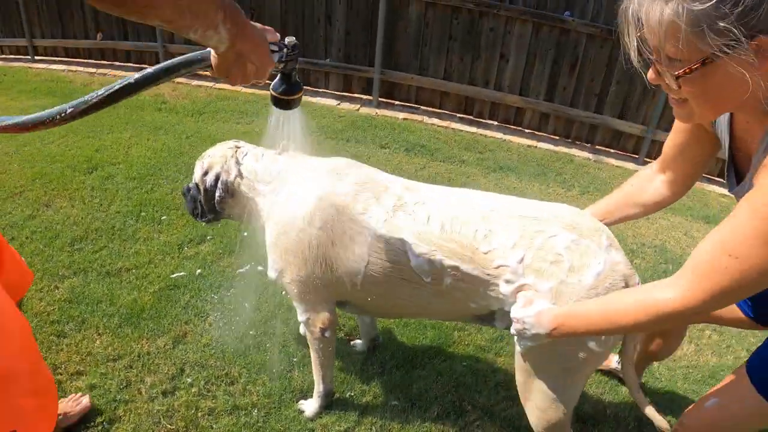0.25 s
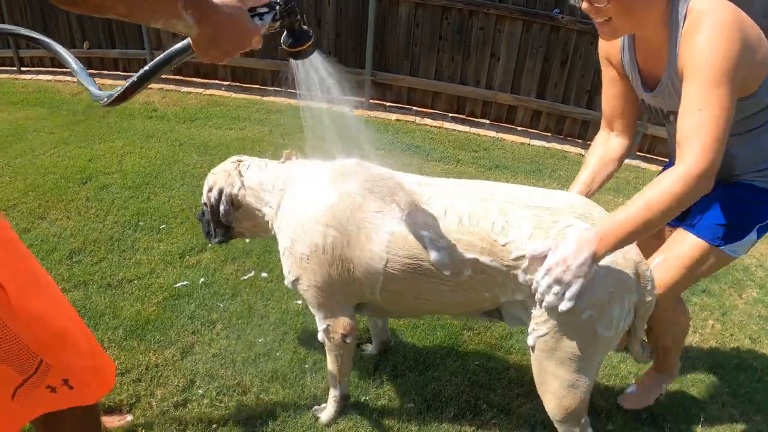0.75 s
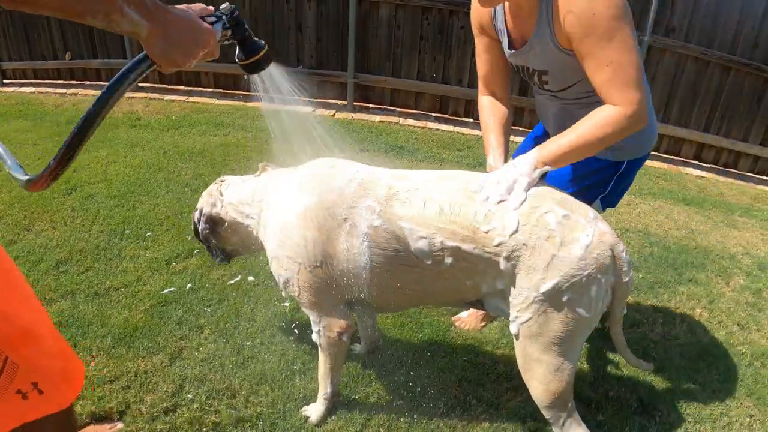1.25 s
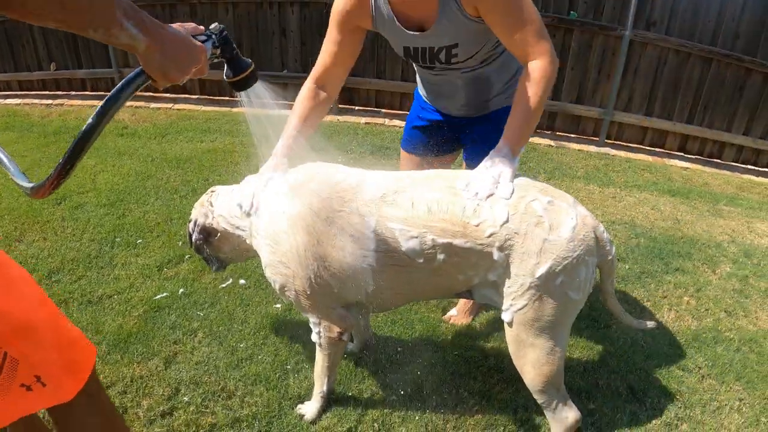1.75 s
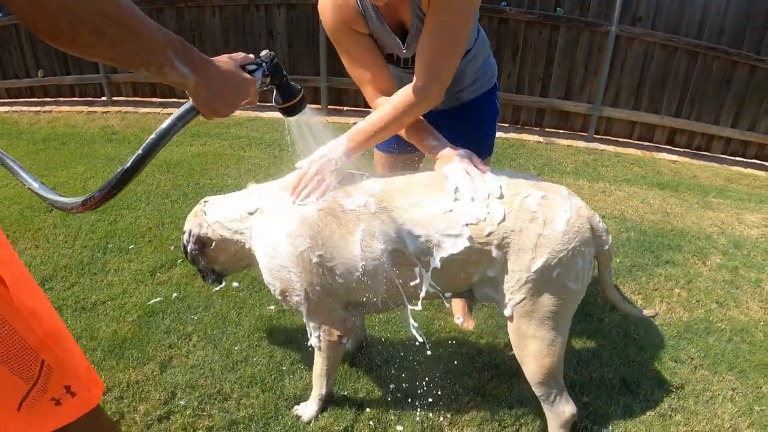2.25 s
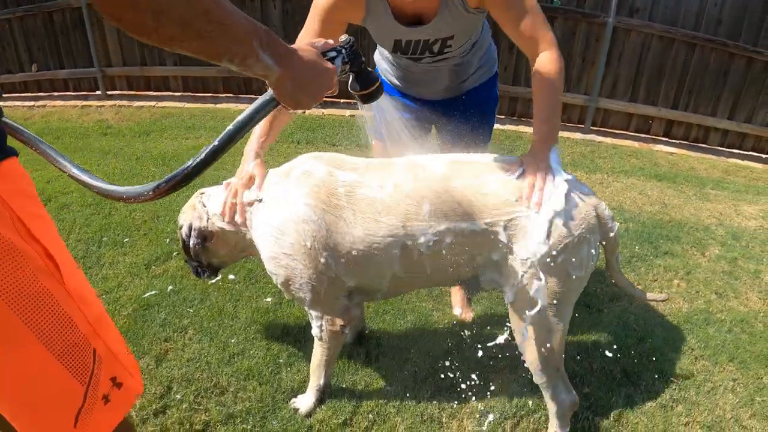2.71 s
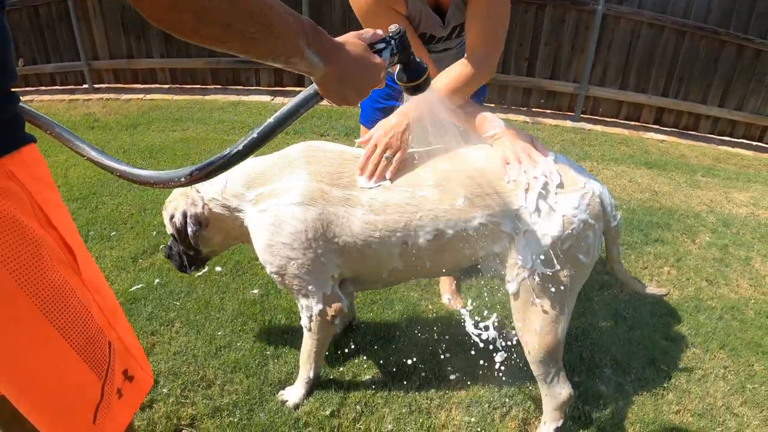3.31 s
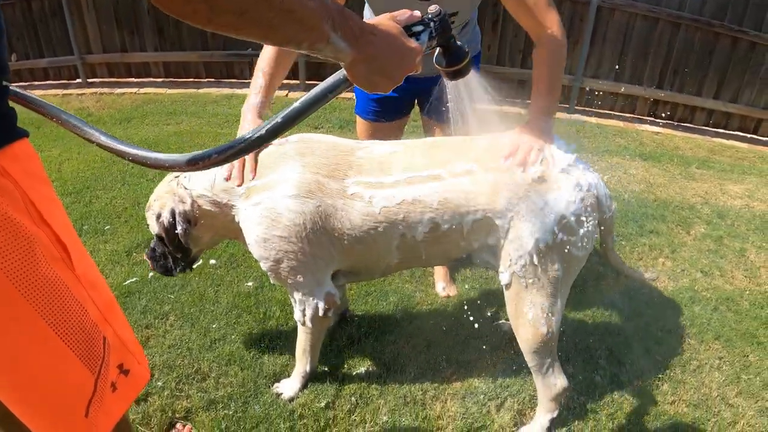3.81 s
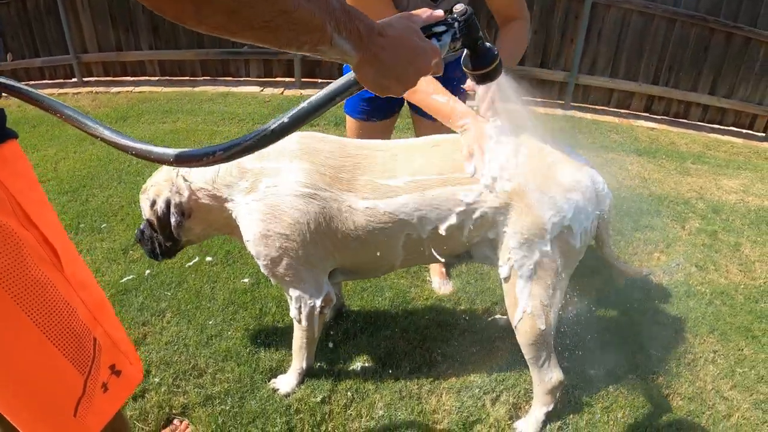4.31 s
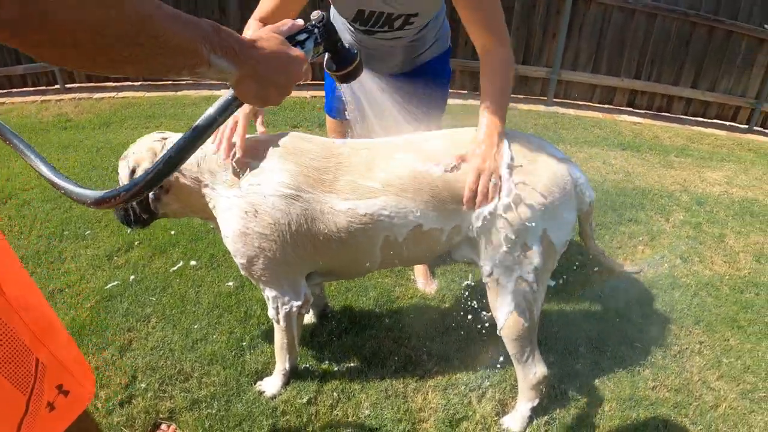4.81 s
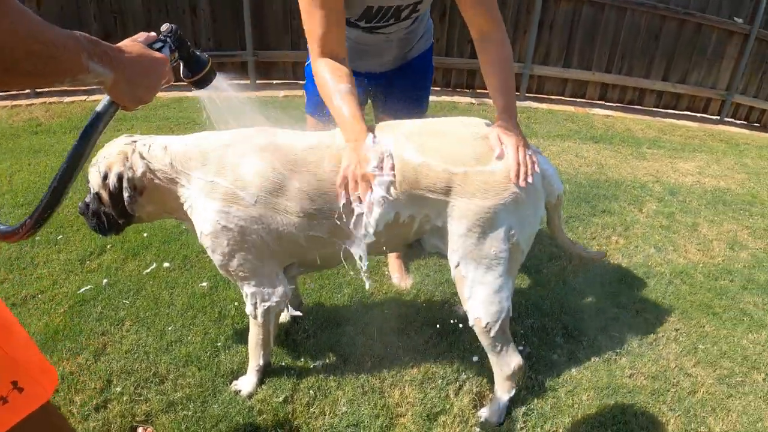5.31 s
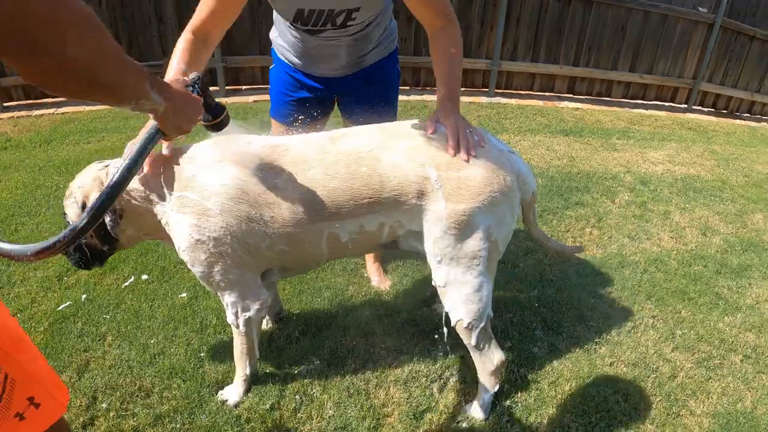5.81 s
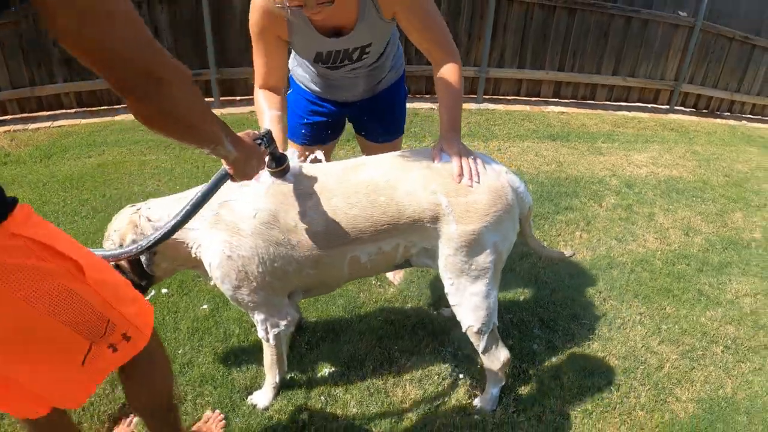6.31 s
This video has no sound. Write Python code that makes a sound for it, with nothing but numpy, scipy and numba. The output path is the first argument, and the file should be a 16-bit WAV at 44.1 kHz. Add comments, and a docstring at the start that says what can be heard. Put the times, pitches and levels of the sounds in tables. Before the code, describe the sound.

A hose jet patters continuously on a dog's wet, foamy coat, close to a small outdoor camera, with little echo. From 0 to 1.3 s the spray is fairly low and drumming, broken by quick soft dips about every 0.2 s, while wind buffets thud and a distant engine throbs low, its pitch falling early, rising slightly around 1.3 s, and fading out by about 1.7 s. From 2 s the spray becomes brighter, fizzing and hissing, repeatedly jumping up in pitch and gliding down, leaning right between 3 and 5 s. Faint fan hum, distant traffic and low rumble lie well beneath. After 5 s it recentres and mellows; from about 5.85 s it weakens, its fine hiss dropping away after 6.2 s, with short dips near 6.4 and 6.5 s. A low gust and dull knocks come at 6.4 to 6.5 s, as thin spray continues.

```python
"""A garden hose sprays a soapy dog on a lawn, a metre or two from a small camera with two microphone ports.
Thousands of drops a second ring briefly on the wet coat: heavy ones drum, middling ones fizz, mist hisses.
The jet sweeps over the back, its pitches gliding and its level dipping; each drop has its own lag at the ports.
Behind it a far engine throbs in sine partials and fades, over a fan's hum and two gliding tones.
Shaped noise makes rumble, distant traffic and light wind; short low pulses make buffets and thumps."""
import sys
import numpy as np
from scipy import signal
from scipy.fft import rfft, irfft, next_fast_len
from scipy.io import wavfile
from scipy.ndimage import uniform_filter1d, map_coordinates
from numba import njit

SR = 44100
rng = np.random.default_rng(int(sys.argv[2]) if len(sys.argv) > 2 else 0)


def unload_audio(sound):
    """Save the sound as a 16-bit wav file, at the path given as the first command line argument."""
    columns = np.transpose(np.atleast_2d(sound))
    # keep every value between -1 and 1, then stretch to whole-number steps
    steps = np.round(np.clip(columns, -1, 1) * 32767)
    wavfile.write(sys.argv[1], SR, steps.astype(np.int16))


N = 288855

# Spray levels stand ahead of the wandering resonances and the microphone's response.
# Where the jet lands: t/s, left minus right/dB and left lag behind right/samples (both scaled by drop size),
# middling pitch spread/octaves, mist pitch shift/octaves
JET_AIM = [(0.0, 0.5, 0.93, 0.47, -0.1), (1.4, -1, 1.1, 0.4, 0.0054), (2.24, -1.5, 1.3, 0.44, 0.047),
           (3.0, -4, 1.93, 0.39, 0.13), (3.74, -4, 2.34, 0.34, -0.03), (4.67, -5.5, 2.24, 0.39, -0.052),
           (5.2, -1, 1.38, 0.304, -0.03), (5.5, -1, 0.82, 0.48, 0.034), (6.18, -0.5, 0.63, 0.51, 0.049),
           (6.55, -0.5, 0.45, 0.38, 0.075)]
# Stretches of the jet's sweeps over the coat, some continuing the sweep before: start t/s,
# middling f/Hz at start, at end, middling level/dB at start, at end,
# heavy f/Hz, heavy level/dB at start, at end, mist level/dB at start, at end
JET_STRETCHES = [(0.0, 2350, 2450, -28, -27.5, 1400, -26, -29, -33, -31),
                 (0.49, 2610, 2410, -29, -30.5, 1238, -28.5, -29, -33, -32.5),
                 (0.85, 2580, 2610, -28.5, -29, 1385, -33, -32, -34, -31),
                 (1.04, 2900, 2900, -29, -29, 1620, -34, -29.5, -32, -34),
                 (1.27, 3000, 2850, -27.5, -29, 1600, -28, -34, -35, -31.5),
                 (1.6, 2980, 2722, -29, -26, 1590, -33, -34.5, -33, -32),
                 (2.06, 4300, 4100, -29.5, -27, 1690, -35.5, -46.5, -31, -34),
                 (2.32, 3580, 2930, -26, -26.5, 1593, -37.5, -32, -33, -29.5),
                 (2.59, 4220, 3230, -27.5, -25.5, 1690, -32.5, -41.5, -31, -31.5),
                 (2.95, 3210, 2610, -26.5, -30, 1545, -36.5, -31.5, -31.5, -33.5),
                 (3.268, 4030, 4270, -33.5, -31.5, 1598, -44, -48, -32, -32.5),
                 (3.35, 4520, 2720, -28, -25, 1610, -42.5, -35, -31, -33),
                 (3.81, 4500, 4020, -28, -26, 1550, -37, -40.5, -31.5, -34.5),
                 (4.1, 3980, 2835, -27, -27.5, 1620, -32, -34.5, -34.5, -36),
                 (4.48, 4140, 4160, -26.5, -26.5, 1610, -32.5, -38.5, -36, -33.5),
                 (4.79, 4296, 3260, -29, -27, 1666, -39.5, -39, -31, -31),
                 (5.03, 2975, 2400, -25, -27, 1654, -38, -34, -33, -32),
                 (5.26, 3970, 3370, -27, -27.5, 1575, -35, -39, -32.5, -32.5),
                 (5.6, 3330, 2920, -28.5, -28.5, 1567, -45, -36, -32, -31.5),
                 (5.85, 3000, 3030, -29.5, -33, 1550, -35, -40, -30.5, -31.5),
                 (6.08, 3090, 3150, -34.5, -32, 1596, -39, -40, -32, -35.5),
                 (6.24, 2950, 2700, -35, -37.5, 1544, -37, -35.5, -40, -42.5),
                 (6.43, 2600, 2580, -33, -32, 1500, -29.5, -33, -41.5, -40)]
# Jet briefly broken or swinging off the coat: t/s, half width/s,
# dip/dB of middling drops, heavy drops, mist (negative lifts)
JET_BREAKS = [(0.116, 0.088, 7.5, 12, 9), (.31, 0.059, 5, 5.5, 3.5), (.49, 0.054, 5, 4.5, 6.5),
              (.68, 0.037, 3.5, 6, 2), (.84, 0.058, 6, 6.5, 7), (1.025, 0.046, 3.5, 2, 4),
              (1.26, 0.058, 2.5, 10, -2), (1.6, 0.061, 1.5, -1.5, 5), (2.06, 0.061, 6.5, -0.5, 5),
              (2.32, 0.027, 5.5, 2, 0.5), (2.595, 0.065, 5, 2.5, 7), (3.248, 0.032, 6, 3, 1.5),
              (3.336, 0.024, 8, -2, 5.5), (3.72, 0.075, 3, 0, 1.5), (3.83, 0.07, 5, 0.5, 0.5),
              (4.489, 0.067, 3, -1.5, 0), (4.8, 0.054, 2.5, -0.5, 5.5), (5.265, 0.037, 7.5, -1, 4),
              (5.82, 0.033, 0, 6, 1.5), (6.385, 0.047, 8, 7.5, 7), (6.53, 0.047, 6, 5.5, 6)]
# Faint late copy of the spray off the wet back, throughout, its delay shifting near the end:
# t/s, delay/ms, strength/share of direct
COAT_MIRROR = [(5.3, 0.36, 0.04), (5.7, 0.37, 0.04), (5.92, 0.42, 0.04), (6.08, 0.41, 0.06),
               (6.25, 0.447, 0.01), (6.55, 0.37, 0.02)]
# Narrow resonances wandering as the jet and hands move over the coat:
# t/s, then f/Hz and boost/dB of the low, middle and high one
COAT_RINGS = [(0.0, 1100, 0, 1360, 4, 2300, 2.2), (.19, 1050, 6, 1420, 6, 1900, 2),
              (.275, 1050, 8, 1450, 1, 1910, 7.9), (.41, 1190, 6, 1500, 1, 1800, 3.5),
              (.55, 1050, 7, 1420, 1, 1800, 1), (.63, 1050, -2, 1420, 5.8, 1820, 6),
              (.79, 1080, 5.5, 1360, 2, 1800, 3.8), (.91, 1050, 2, 1370, 5.3, 1900, 1),
              (1.1, 1000, 3, 1470, 2.7, 2100, 3), (1.4, 960, 5.5, 1380, 6, 2000, 1.04),
              (1.75, 979, 3.5, 1470, 5, 2200, 2.4), (2.0, 980, 8, 1430, 4.5, 2200, 2.2),
              (2.2, 950, 2, 1500, 1, 2180, 3), (2.48, 960, 4.5, 1380, 5.5, 2097, 3),
              (2.64, 955, 8, 1660, 4.4, 2200, 2), (2.85, 950, 5.5, 1550, 1, 2190, 2.7),
              (3.14, 960, 6.5, 1600, 6.6, 2200, 1.7), (3.5, 920, 5, 1470, 3.3, 2200, 3),
              (3.8, 1050, 4.5, 1450, 4.9, 2100, 2), (4.15, 1110, 2, 1470, 6.1, 1997, 1),
              (4.57, 1100, 2.5, 1420, 3.84, 1840, 4.7), (4.9, 950, 2, 1500, 3.54, 2100, 3),
              (5.2, 1060, 5, 1500, 4, 2200, 3), (5.47, 1080, 7, 1550, 2, 2200, 2),
              (5.75, 1020, 7, 1390, 5.5, 2290, 3), (5.95, 1030, 6.5, 1500, 1, 2480, 5.1),
              (6.15, 1000, 0, 1620, 5, 2505, 4.9), (6.35, 1000, 3, 1550, 5.6, 2680, 5),
              (6.55, 1000, 2, 1500, 3.3, 3100, 3)]
# Microphone behind its waterproof membrane: f/Hz, level/dB
MEMBRANE_RESPONSE = [(300, -12), (600, -11), (760, -11), (880, -10), (1000, -7), (1250, -8), (1500, -7.5),
                     (1900, -5.5), (2500, -2.5), (3800, 0), (4700, 1.5), (5150, 1), (5450, -0.5),
                     (6500, 2.5), (7700, 1.5), (8800, 3), (11000, -2.5), (12200, -2), (15000, -7)]
# Extra shading of the far port, on the left: f/Hz, level/dB
FAR_PORT_SHADING = [(200, -1.24), (1500, -0.26), (3000, 1.5), (5000, -1), (8000, -4), (11000, -2.5),
                    (14000, -2)]
# Neighbourhood rumble: t/s, level/dB before its waver
RUMBLE_LEVEL = [(0.0, -38), (.6, -36.5), (1.2, -39.5), (1.8, -39), (2.8, -42.5), (4.1, -42), (5.0, -43.5),
                (5.8, -44), (6.45, -42), (6.55, -40)]
# Rumble colour: f/Hz, relative level/dB per Hz
RUMBLE_COLOUR = [(24, -39), (40, -12), (65, 0), (86, -1.5), (123, -3.5), (145, -9), (172, -8.5), (271, -21),
                 (400, -34.5), (700, -70)]
# Distant traffic: t/s, level/dB before its swells
TRAFFIC_LEVEL = [(0.0, -50.5), (0.7, -50.5), (1.28, -56), (1.45, -54), (1.97, -54), (2.2, -56.5),
                 (3.2, -53), (4.2, -54), (5.0, -58), (5.8, -57), (6.05, -59.5), (6.55, -47)]
# Traffic colour: f/Hz, relative level/dB per Hz
TRAFFIC_COLOUR = [(120, -25), (200, 5.5), (300, 2), (521, -0.5), (800, 0.5), (900, 2.5), (1170, -4.5),
                  (1980, -90)]
# Gusts on the ports: crest t/s, level/dB, left minus right/dB, half width/s
WIND_GUSTS = [(.095, -32, -16, 0.032), (.35, -36, -5, 0.26), (.72, -43, -11, 0.067),
              (.94, -36.5, 10, 0.053), (1.33, -41, 9, 0.14), (1.71, -38.5, 12, 0.15), (2.15, -50, -2, 0.13),
              (2.7, -52, 0, .1), (3.5, -51, 0, .1), (3.9, -55, 0, .15), (4.55, -54, -5, .15),
              (5.15, -45, -4, 0.18), (5.5, -48, -5, 0.072), (5.92, -50, 0, .1), (6.22, -47, 10, 0.045),
              (6.43, -29, 2, 0.044)]
# Wind colour: f/Hz, relative level/dB per Hz
WIND_COLOUR = [(8, -24), (18, -14), (38, 5), (55, -9), (90, -56)]
# Far engine shifting up a gear: t/s, firing rate f/Hz before its waver, first partial level/dB,
# second partial level/dB before its flutter, throb depth/0-1
ENGINE_PATH = [(0.0, 124.8, -39, -51.5, 0.3), (0.2, 110.8, -40, -50.5, 0.4), (0.33, 100, -29.5, -46.5, .05),
               (.43, 99.4, -31.5, -42.5, 0), (0.55, 99.1, -27, -45, 0.05), (.66, 98.7, -36.5, -46, .05),
               (0.75, 99.7, -29, -43, 0), (0.84, 99, -40, -44.5, 0.4), (0.95, 99.2, -33.5, -47.5, 0.1),
               (1.3, 104.2, -32.5, -51.5, 0.22), (1.38, 106.9, -36.5, -49.5, .4),
               (1.44, 104.1, -47, -50, 0.5), (1.65, 101.7, -44, -47.5, 0.18)]
# Partials of a fan next door: multiple of the hum's f, level over the hum/dB
FAN_PARTIALS = [(1, 1), (2, -9.5), (3, -17.5)]
# Wavering hum of the fan: t/s, f/Hz, level/dB before the flutter
FAN_PATH = [(0.0, 56.7, -47), (1.3, 57.15, -48), (1.66, 55.9, -41), (1.9, 57.1, -43.5), (2.1, 56.85, -44),
            (2.7, 56.8, -44.5), (3.15, 57.54, -54), (3.4, 56.3, -41.5), (3.6, 55.9, -50), (3.8, 56, -45.5),
            (4.13, 55.7, -50), (4.4, 57.57, -46.5), (5.2, 56.6, -48), (5.5, 56.8, -44), (5.72, 57.06, -52),
            (6.05, 56.9, -41.5), (6.3, 56.84, -49), (6.55, 55.3, -45)]
# Buffets of wind that push one port and pull the other: t/s, peak level/dB, f/Hz, left minus right/dB
WIND_BUFFETS = [(.074, -28, 65, -8), (.17, -35, 80, -4), (.214, -30, 95, -8), (.275, -36, 70, -4),
                (.335, -36, 70, -4), (.62, -39, 80, -3), (.685, -30, 80, 1), (.93, -32, 100, 5),
                (1.302, -29, 90, 4), (1.44, -38, 80, 0), (1.787, -34, 80, 0), (1.825, -36, 70, 4),
                (1.95, -33, 75, 12), (2.025, -41, 75, 3), (4.95, -46, 80, -3), (5.062, -41, 80, -8),
                (6.21, -45, 80, 7), (6.38, -40, 70, 0), (6.428, -34, 70, 0)]
# Dull thumps through the camera mount: t/s, peak level/dB, f/Hz, left minus right/dB
MOUNT_THUMPS = [(0.66, -34, 45.8, -3.0), (6.379, -46, 37.4, -1), (6.478, -30, 63, -7.5),
                (6.53, -32, 66.6, -10)]
# Second engine tone, climbing and then sagging a little: t/s, f/Hz, level/dB before the flutter
WHINE_PATH = [(.9, 156, -66), (1.1, 165, -50), (1.6, 172.8, -55), (2.2, 173.7, -58.5), (2.9, 171, -56),
              (3.101, 170, -60)]
# Low drone that sags away: t/s, f/Hz, level/dB before the flutter
DRONE_PATH = [(2.0, 87.9, -58), (2.25, 85.7, -48), (2.5, 83.5, -60), (2.75, 81.4, -45), (3.1, 79.2, -49),
              (3.6, 75.6, -54), (4.1, 75.5, -59), (4.5, 74, -48), (4.9, 72.8, -52)]

BREAK_EDGE = 2.7  # how squarely a break sets in
TURN_S = 0.069  # change from one stretch to the next
HEAVY_LEAD_S = 0.075  # heavy drops reach their end level this long before the turn
HEAVY_WOBBLE_DB, HEAVY_WOBBLE_PER_S = 0.63, 9
RING_WIDTH = 0.12  # share of the resonance's frequency
YARD_T60_S, ECHO_DRIFT_MS = 0.15, 0.4
BREEZE_DB, BREEZE_WAVER_DB = -59, -1
THROB_HZ, THROB_AT_S = 8.64, 0.614  # rate, time of one trough
THIRD_DB = -21  # engine's third partial over its second
# Low tones also arrive off the fence, out of step at the ports: phase lead left, lag right, in radians
PORT_PHASE = 0.19 * np.array([[1], [-1]])
# Halves a left-minus-right level between the ports
LEAN = np.array([[.5], [-.5]])
TOP_HZ = 15400


def undb(db):
    """Turn dB into amplitude gain."""
    return 10 ** (np.asarray(db) / 20)


def read(table, t):
    """Interpolate each column of a curve table at times t."""
    s, *columns = np.transpose(table)
    return [np.interp(t, s, column) for column in columns]


def colour(x, points):
    """Filter by (Hz, dB) points joined on a log frequency axis."""
    hz, db = np.transpose(points)
    n = next_fast_len(N)
    f = np.maximum(np.arange(n // 2 + 1) * SR / n, 1)
    gain = undb(np.interp(np.log(f), np.log(hz), db))
    return irfft(rfft(x, n) * gain, n)[..., :N]


def unit(x):
    """Scale to rms 1."""
    return x / np.sqrt(np.mean(x ** 2))


def walk(rate):
    """Glide between random levels, rate of them a second, with rms 1."""
    hold = int(SR / rate)
    steps = np.repeat(rng.standard_normal(N // hold + 1), hold)
    return unit(uniform_filter1d(steps, hold)[:N])


def bump(t, at, half, steep=2):
    """Bell of height 1; steeper powers square its shoulders."""
    return np.exp(-np.abs((t - at) / half) ** steep)


@njit
def add_rings(out, start, hz, cycles, size, sr):
    """Add short rings that begin between samples, swell for the given cycles and die."""
    for k in range(len(start)):
        first = int(np.ceil(start[k]))
        age = first - start[k]
        rate = hz[k] / sr * (2j * np.pi - 1 / cycles)
        z = size[k] * hz[k] / sr * np.exp(rate * age)
        turn = np.exp(rate)
        last = first + int(6 * cycles * sr / hz[k])
        for i in range(max(first, 0), min(last, len(out))):
            out[i] += z.imag * age
            z *= turn
            age += 1


def sweeps(t):
    """Pitches and levels of the drops, gliding through each stretch and changing at each break."""
    (start, mid_hz_a, mid_hz_b, mid_a, mid_b,
     heavy_hz, heavy_a, heavy_b, mist_a, mist_b) = np.transpose(JET_STRETCHES)
    end = np.append(start[1:], N / SR)

    def glide(a, b, lead=0):
        knots = np.ravel([start + TURN_S / 2, end - TURN_S / 2 - lead], "F")
        return np.interp(t, knots, np.ravel([a, b], "F"))

    mid_dip, heavy_dip, mist_dip = sum(
        np.outer(dips_db, bump(t, s, half, BREAK_EDGE)) for s, half, *dips_db in JET_BREAKS)
    heavy_db = glide(heavy_a, heavy_b, HEAVY_LEAD_S) - heavy_dip
    heavy_db = heavy_db + HEAVY_WOBBLE_DB * walk(HEAVY_WOBBLE_PER_S)
    mid_db = glide(mid_a, mid_b) - mid_dip
    mist_db = glide(mist_a, mist_b) - mist_dip
    return glide(mid_hz_a, mid_hz_b), glide(heavy_hz, heavy_hz), heavy_db, mid_db, mist_db


def drops(count, centre_hz, octaves, cycles, scatter_db, width, bend, patchy_db):
    """A shower of bursting drops; each lands at its own place, so it reaches the ports with its own lag."""
    when, sign = rng.random((count, 2)).T
    pitch, place = rng.standard_normal((count, 2)).T
    start = when * N
    at = start.astype(int)
    spread = (octaves * np.ones(N))[at]
    hz = np.clip(centre_hz[at] * 2 ** (spread * pitch), 200, .45 * SR)
    # many small drops, few large, none huge
    size_db = scatter_db * np.minimum(rng.exponential(size=count), 3)
    # the root gives equal energy whatever the pitch
    size = np.sign(sign - .5) * undb(size_db) * np.sqrt(hz)
    # long waves bend round the camera body, which lengthens their lag
    lag = bend * read(JET_AIM, start / SR)[1] + width * place
    out = np.zeros((2, N))
    add_rings(out[0], start + lag / 2, hz, 1. * cycles, size, 1. * SR)
    add_rings(out[1], start - lag / 2, hz, 1. * cycles, size, 1. * SR)
    # the jet arrives in clumps
    return unit(out) * undb(patchy_db * walk(30))


def yard(x, wet):
    """Fence, house and lawn return a short scattered tail, unrelated between the ports."""
    age = np.arange(SR // 5) / SR
    tail = rng.standard_normal((2, len(age))) * undb(-60 * age / YARD_T60_S) * (age > .004)
    tail /= np.sqrt(np.sum(tail ** 2, axis=1, keepdims=True))
    # the paths change length as things move
    place = np.arange(N) - ECHO_DRIFT_MS / 1000 * SR * walk(3)
    moved = np.array([np.interp(place, np.arange(N), port) for port in x])
    return x + wet * signal.fftconvolve(moved, tail, axes=1)[:, :N]


def mirror(direct, t):
    """The wet back adds a faint, slightly late copy of the spray throughout."""
    ms, strength = read(COAT_MIRROR, t)
    late = np.array([map_coordinates(port, [(t - ms / 1000) * SR], order=3) for port in direct])
    return (direct + strength * late) / np.sqrt(1 + strength ** 2)


def spray(t):
    """Three sizes of drop and the bubbles they trap in the foam, leaning between the ports with the aim."""
    mid_hz, heavy_hz, heavy_db, mid_db, mist_db = sweeps(t)
    pan_db, _, spread, shift = read(JET_AIM, t)
    heavy = drops(count=20000, centre_hz=heavy_hz, octaves=0.18, cycles=0.52,
                  scatter_db=0.5, width=0.44, bend=1.3, patchy_db=1.0)
    mid = drops(count=60000, centre_hz=mid_hz, octaves=spread, cycles=0.45,
                scatter_db=0.54, width=0.72, bend=1.07, patchy_db=0.48)
    mist = drops(count=130000, centre_hz=7000 * 2 ** shift, octaves=0.47, cycles=0.38,
                 scatter_db=0.1, width=0.59, bend=0.59, patchy_db=0.5)
    big_bubbles = drops(count=1500, centre_hz=heavy_hz, octaves=0.314, cycles=3.7,
                        scatter_db=2.5, width=0.88, bend=2.6, patchy_db=-3.0)
    small_bubbles = drops(count=5000, centre_hz=mid_hz, octaves=spread, cycles=5.7,
                          scatter_db=2.5, width=0.53, bend=1.04, patchy_db=0.5)
    # the body of the camera shades treble more than bass
    lean_db = pan_db * LEAN
    drumming = undb(heavy_db + 0.46 * lean_db) * yard(heavy + undb(-6.5) * big_bubbles, wet=0.16)
    fizz = undb(mid_db + 0.59 * lean_db) * yard(mid + undb(-10.5) * small_bubbles, wet=0.3)
    hiss = undb(mist_db + 1.0 * lean_db) * yard(mist, wet=0.42)
    return mirror(drumming + fizz + hiss, t)


@njit
def band(x, hz, damping, sr):
    """Band-pass with a moving centre, gain 1 at the centre."""
    y, band_state, low_state = np.empty(len(x)), 0., 0.
    for i in range(len(x)):
        g = np.tan(np.pi * hz[i] / sr)
        v = (band_state + g * (x[i] - low_state)) / (1 + g * (g + damping))
        band_state = 2 * v - band_state
        low_state += 2 * g * v
        y[i] = damping * v
    return y


def coat_rings(x, t):
    """Lift or thin the spray at each wandering resonance by adding a scaled narrow band of it."""
    columns = read(COAT_RINGS, t)
    out = x
    for hz, db in zip(columns[::2], columns[1::2]):
        narrow = np.array([band(port, hz, RING_WIDTH, 1. * SR) for port in x])
        out = out + (undb(db) - 1) * narrow
    return out


def coloured_noise(shape, apart):
    """Coloured noise of rms 1, part of it unrelated between the ports."""
    mid, side = rng.standard_normal((2, N))
    return unit(colour(np.array([mid + apart * side, mid - apart * side]), shape))


def neighbourhood_rumble(t):
    """Low noise with a wavering level, mostly shared by the ports."""
    level_db = read(RUMBLE_LEVEL, t)[0] + 2.4 * walk(6)
    return undb(level_db) * coloured_noise(RUMBLE_COLOUR, 0.26)


def distant_traffic(t):
    """Noise above the rumble, coming from all round and swelling by itself."""
    level_db = read(TRAFFIC_LEVEL, t)[0] + 2.9 * walk(6)
    return undb(level_db) * coloured_noise(TRAFFIC_COLOUR, 0.38)


def wind(t):
    """A wavering breeze of deep noise, with gusts that mostly press harder on one port."""
    gusts = sum(undb(db + pan_db * LEAN) * bump(t, s, half) for s, db, pan_db, half in WIND_GUSTS)
    breeze = undb(BREEZE_DB + BREEZE_WAVER_DB * walk(6))
    return (breeze + gusts) * coloured_noise(WIND_COLOUR, 0.57)


def engine(t):
    """Three sine partials of wavering pitch; the first throbs, the upper two flutter together."""
    hz, first_db, second_db, depth = read(ENGINE_PATH, t)
    wavering_hz = hz * (1 + 0.0089 * walk(22.7))
    phase = 2 * np.pi * np.cumsum(wavering_hz) / SR + PORT_PHASE
    end_s = ENGINE_PATH[-1][0]
    fade = np.interp(t, [end_s, end_s + 0.087], [1, 0])
    throb = 1 - depth * np.cos(2 * np.pi * THROB_HZ * (t - THROB_AT_S))
    first = undb(first_db) * throb * np.sin(phase)
    upper = np.sin(2 * phase) + undb(THIRD_DB) * np.sin(3 * phase)
    return np.sqrt(2) * fade * (first + undb(second_db + 0.8 * walk(13.0)) * upper)


def fan(t):
    """A hum whose sine partials flutter on their way through the air."""
    hz, level_db = read(FAN_PATH, t)
    phase = 2 * np.pi * np.cumsum(hz) / SR
    hum = np.zeros((2, N))
    for multiple, db in FAN_PARTIALS:
        gain = np.sqrt(2) * undb(level_db + db + 1.8 * walk(7))
        hum += gain * np.sin(round(multiple) * phase + PORT_PHASE)
    return hum


def low_pulses(table, cycles, left):
    """Low rings that swell for the given cycles and die; left is their sign at the left port."""
    s, db, hz, pan_db = np.transpose(table)
    out = np.zeros((2, N))
    for port, side, sign in zip(out, (1, -1), (left, 1)):
        # e / cycles brings the crest of the swell to the given level
        size = sign * np.e / cycles * undb(db + side * pan_db / 2)
        add_rings(port, s * SR, 1. * hz, cycles, size, 1. * SR)
    return out


def wind_buffets():
    """Short puffs of wind pressure, opposite in sign at the two ports."""
    return low_pulses(WIND_BUFFETS, cycles=0.7, left=-1)


def mount_thumps():
    """Dull knocks through the camera mount, alike in sign at both ports."""
    return low_pulses(MOUNT_THUMPS, cycles=1.0, left=1)


def gliding_tone(t, path, flutter_db):
    """One sine with a gliding pitch and fluttering level, heard only within its path's times."""
    hz, db = read(path, t)
    sounding = (t > path[0][0]) & (t < path[-1][0])
    phase = 2 * np.pi * np.cumsum(hz) / SR + PORT_PHASE
    return np.sqrt(2) * undb(db + flutter_db * walk(8)) * sounding * np.sin(phase)


def scene():
    """Close spray at the microphone, with rumble, traffic, wind, far tones, buffets and thumps."""
    t = np.arange(N) / SR
    close_spray = colour(coat_rings(spray(t), t), MEMBRANE_RESPONSE)
    background = neighbourhood_rumble(t) + distant_traffic(t) + wind(t)
    far_tones = engine(t) + fan(t)
    far_tones = far_tones + gliding_tone(t, WHINE_PATH, 4.6) + gliding_tone(t, DRONE_PATH, 1.2)
    return close_spray + background + yard(far_tones, wet=0.05) + wind_buffets() + mount_thumps()


def record(dry):
    """Shade the far left port, then cut the top of both steeply as the recorder does."""
    ports = np.array([colour(dry[0], FAR_PORT_SHADING), dry[1]])
    # 10th order elliptic low-pass: 0.2 dB ripple, 70 dB stop band
    top_cut = signal.ellip(10, .2, 70, TOP_HZ, fs=SR, output="sos")
    return signal.sosfilt(top_cut, ports)


dry = scene()
out = record(dry)
unload_audio(out)
```